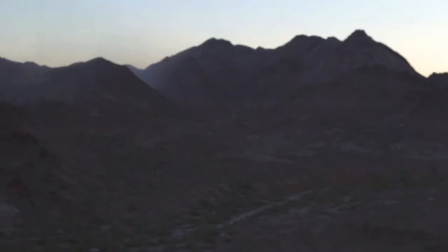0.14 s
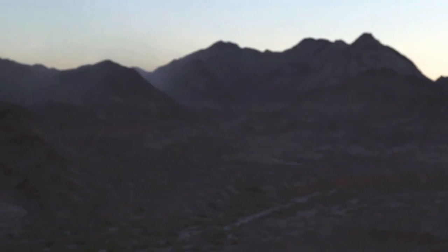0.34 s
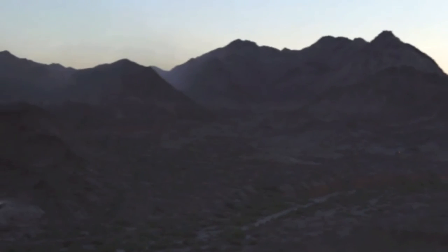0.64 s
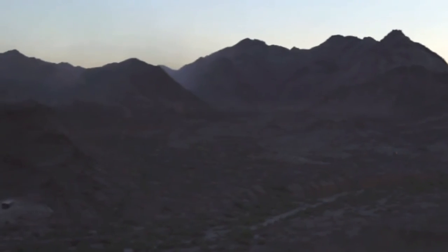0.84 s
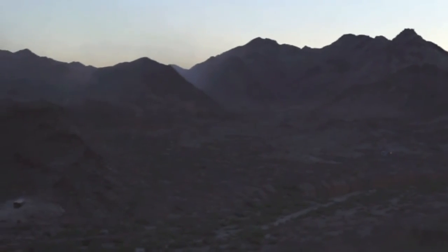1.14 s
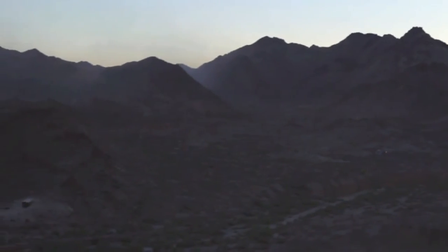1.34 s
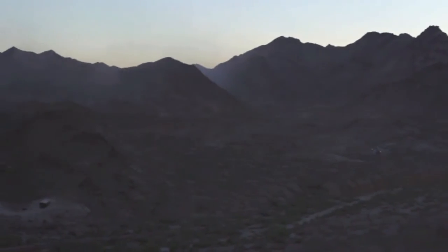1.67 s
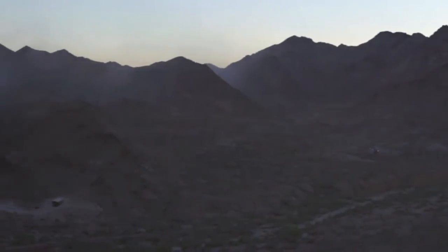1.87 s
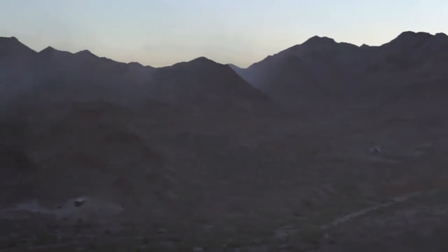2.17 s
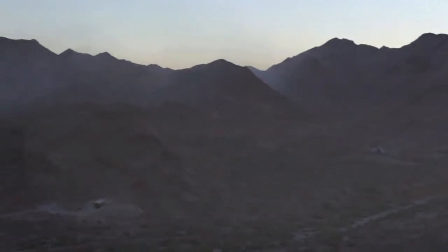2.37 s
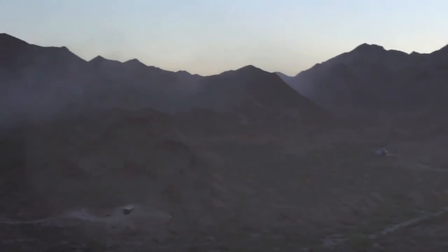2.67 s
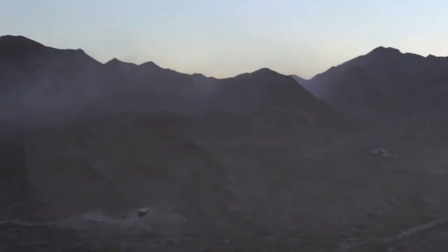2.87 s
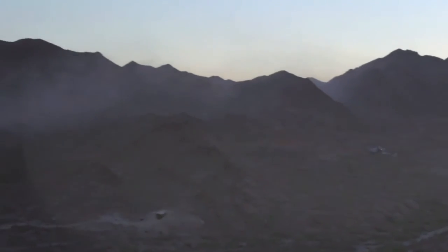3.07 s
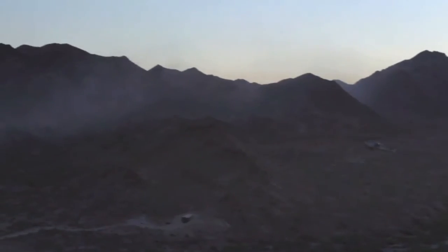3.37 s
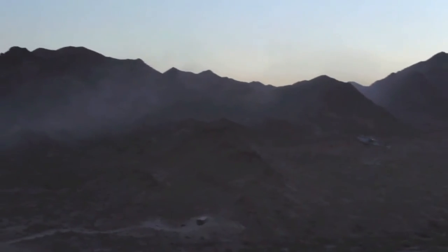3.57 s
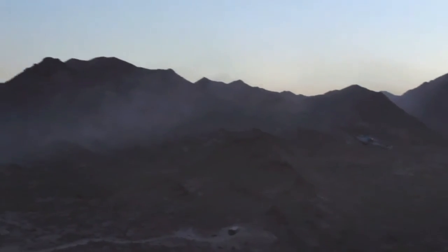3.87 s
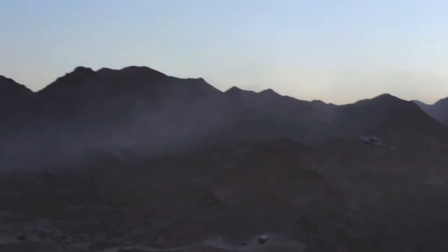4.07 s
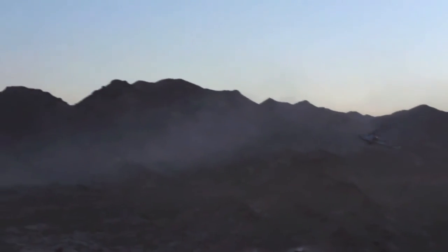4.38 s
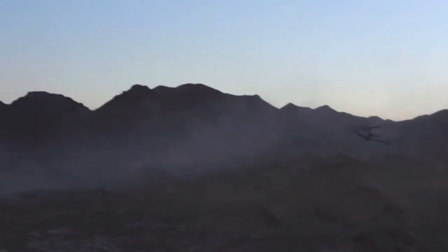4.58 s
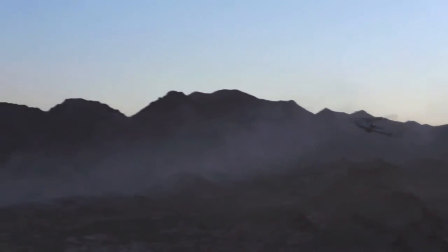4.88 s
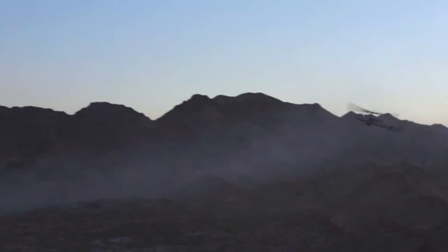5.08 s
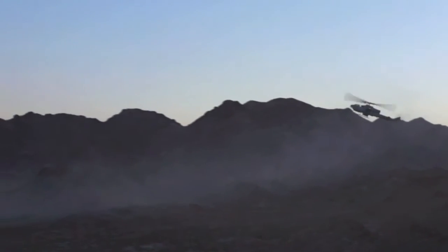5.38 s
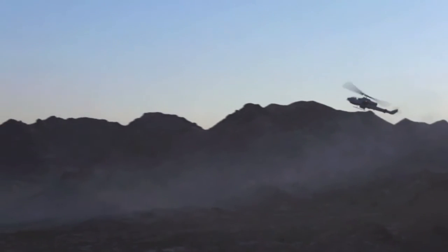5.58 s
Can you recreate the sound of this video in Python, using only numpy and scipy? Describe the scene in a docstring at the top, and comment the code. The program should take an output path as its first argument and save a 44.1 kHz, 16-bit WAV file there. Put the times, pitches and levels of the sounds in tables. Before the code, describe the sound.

A distant helicopter chops through a mountain valley for nearly six seconds, at about twelve blade slaps a second. Each slap is a short, hollow thud with a crack and a quick echo from the slopes. Low rumble, exhaust noise, soft turbine hiss and a faint wavering whine continue underneath, the whine clearest near 1.8 seconds.

Close to the microphone, cloth rustles faintly during the first second, followed by tiny camera ticks until about 2.3 seconds and a few more after 3. Irregular dull pops crowd between the slaps from 0.5 to 1.2 seconds and occasionally return later.

The slaps grow loud and sharp from 2.4 to 2.8 seconds, ease, then surge again from 3.7 to 4.7, the strongest slightly distorted. They stay crisp while weakening after that, and are softer and duller by 5.5 seconds, still beating at the end.

```python
"""Helicopter blade slap in a valley

A distant two-blade helicopter banks across a mountain valley. Each blade passage radiates a pressure
pulse (suction dip, crack, short ring, low thump) that the slopes reflect; dull pops fall between.
Broadband rumble, exhaust and turbine noise and a gearbox whine lie underneath. Beside the microphone,
cloth rustles and the body of a small camera ticks. The loudest slaps clip."""
import sys
import numpy as np
from scipy import signal
from scipy.fft import rfft, irfft, next_fast_len
from scipy.io import wavfile
from scipy.ndimage import uniform_filter1d, map_coordinates

SR = 44100
rng = np.random.default_rng(int(sys.argv[2]) if len(sys.argv) > 2 else 0)


def bounce(signal):
    """Save signal as a 16-bit WAV file at the path given by the first command-line argument."""
    frames = np.transpose(np.atleast_2d(signal))
    limited = np.clip(frames, -1, 1)
    pcm = np.round(limited * 32767).astype(np.int16)
    wavfile.write(sys.argv[1], SR, pcm)


N = 252252

# blade passages: t/s, ring level/dB, crack level/dB, echo level/dB re the slap
BLADE_PASSAGES = [(0.059, -35, -44, -4), (0.1473, -11.5, -48, -13), (0.232, -17, -37, 1),
                  (0.3173, -16.5, -38, -3.5), (0.4026, -15, -50, -8), (0.4883, -17, -47, -18),
                  (0.5728, -16, -53, 0.5), (0.6578, -17.5, -44, -1), (0.747, -20, -52, 3),
                  (0.829, -29, -60, -2), (0.9148, -23, -51, 4.4), (0.9996, -17, -47, -11),
                  (1.0862, -28, -55, 8.5), (1.1721, -17, -64, -2.5), (1.2572, -15.5, -58, -4),
                  (1.3417, -17.5, -56, -10), (1.4263, -17, -57, -0.2), (1.511, -15, -46, -1.5),
                  (1.5983, -21.5, -49, -6), (1.6809, -19.5, -48, -1), (1.767, -23.6, -44, 6.5),
                  (1.8509, -13.5, -53, -15), (1.9353, -12, -34, -7.9), (2.0231, -17, -44, 0.5),
                  (2.1051, -16, -50, 7), (2.1894, -16, -31.5, -1.5), (2.274, -14.1, -40, -2.5),
                  (2.3605, -13, -43, -6.5), (2.4448, -6, -30, -8.5), (2.5301, -8.5, -21, -6),
                  (2.6151, -8.5, -21, -10), (2.6997, -11, -41.5, -14), (2.776, -9, -32.5, -10),
                  (2.8602, -18, -34.5, -0.5), (2.9455, -17.5, -44, -10.5), (3.0311, -15.5, -34.5, -15.5),
                  (3.1164, -17, -36.5, -17), (3.1988, -22.5, -33, -5), (3.2904, -14, -49.5, -6.5),
                  (3.3749, -19, -60.5, -11), (3.4581, -16.5, -50, -8.5), (3.5455, -15.5, -33, -9),
                  (3.6284, -20, -32.5, 3.5), (3.7075, -8.5, -26, -3), (3.794, -7.5, -25.5, -11.5),
                  (3.881, -9.5, -29, -6), (3.9666, -8, -26.5, -6.5), (4.0531, -6.5, -26.5, -10),
                  (4.141, -6.5, -23, -8.5), (4.228, -7.5, -22, -9), (4.315, -6, -19, -22),
                  (4.403, -6.5, -23, -21), (4.4915, -8.4, -21.5, -11.5), (4.5803, -9.6, -22, -19),
                  (4.669, -10.5, -19.5, -16.5), (4.7582, -15, -22, -22), (4.8472, -13.5, -22.5, -13),
                  (4.9366, -13.5, -21.5, -13.5), (5.0262, -15, -28.5, -22), (5.1169, -15.5, -29.5, -11),
                  (5.2067, -22, -30, -8), (5.2983, -19.5, -33.5, -5.5), (5.3907, -24, -32.5, -2),
                  (5.4836, -23.5, -44, -0.5), (5.5719, -20, -49, -2), (5.6668, -17, -36, -18)]
# the slap as the helicopter turns: t/s, ring f/Hz, thump level/dB
SLAP_DIRECTIVITY = [(0, 218, -30), (.5, 203, -29.5), (1.2, 165, -23), (1.7, 168, -17.5), (2.3, 190, -23),
                    (2.5, 222.5, -26), (3.15, 245, -32), (3.4, 178, -20.5), (3.7, 200, -19),
                    (3.95, 202.5, -29), (4.4, 189.4, -43), (5.1, 165.6, -41.5), (5.72, 145.5, -22.5)]
# rock faces that return the echo in turn: start t/s, delay/ms, drift/(ms/s)
ROCK_FACES = [(0, 16.4, 0), (.7, 13, -1.8), (2.23, 11, .9), (2.74, 8.4, 0), (3.25, 12.3, 0),
              (3.67, 16.8, 3)]
# decay of the sound scattered by the slopes: f/Hz, T60/s
SLOPE_DECAY = [(60, 0.38), (250, 0.1), (1000, 0.15), (4000, 0.069)]
# dull pops between slaps: t/s, pulse level/dB, clack level/dB
SINGLE_POPS = [(.602, -23, -39), (.617, -14, -39), (.626, -21, -47), (.635, -12.5, -52), (.643, -19, -58),
               (.674, -25, -51), (.72, -15, -53), (.754, -26, -52), (.857, -33, -41.5), (.877, -22, -39),
               (.947, -20, -45), (.969, -19, -50), (1.01, -23, -44), (1.038, -21.5, -38.5),
               (1.112, -21, -44), (1.129, -16, -33), (1.646, -19, -42), (2.063, -24.5, -57),
               (2.139, -17, -47.5), (3.311, -19, -40.5), (3.721, -26.5, -34), (3.809, -14.5, -33)]
# runs of weaker pops: start t/s, duration/s, level/dB
POP_FLURRIES = [(0.541, .23, -23), (0.902, .25, -25), (1.604, .06, -28)]
# broadband noise: t/s, rumble level/dB, exhaust level/dB, turbine level/dB
ROAR_LEVELS = [(0, -35.5, -34.5, -53), (.55, -27.5, -37, -51.5), (1.07, -26.5, -41, -57),
               (1.3, -32.5, -46, -54.5), (2, -28.5, -40.5, -48), (2.3, -32.5, -37.5, -50),
               (2.6, -39.5, -42, -55), (3.1, -33, -41.5, -54.5), (3.74, -34, -35.5, -49.5),
               (4.4, -37.5, -40, -49.5), (4.7, -42, -44, -54), (5.21, -40.5, -43, -53),
               (5.72, -33, -37.5, -47.5)]
# noise spectra: f/Hz, relative density level/dB
RUMBLE_SPECTRUM = [(25, -35.5), (80, -4.5), (130, -6.5), (200, -1.5), (260, -5.5), (440, -17.5), (900, -30),
                   (1500, -55.5), (2600, -120)]
EXHAUST_SPECTRUM = [(180, -32), (300, -6), (359, -2), (453, -8.5), (693, -8.5), (909, -12), (1400, -27.5),
                    (1820, -64), (3080, -120)]
TURBINE_SPECTRUM = [(590, -29), (1000, -8.5), (1310, -7.5), (1510, -7.5), (1660, -8), (1890, -9.5),
                    (2570, -21), (3050, -22), (3960, -32.5), (4900, -51.5), (6710, -120)]
CLOTH_SPECTRUM = [(1500, -29.5), (3000, 0), (4500, -3.5), (6500, -9.5), (7500, -6.5), (8600, -3.5),
                  (11000, -10.5), (14000, -17.5), (16000, -28)]
# gearbox whine: t/s, level/dB
WHINE_LEVELS = [(0, -57.5), (.54, -59), (.78, -70), (.9, -55.5), (1.15, -58), (1.36, -63.5), (1.5, -48),
                (1.72, -55.5), (1.82, -42), (1.93, -54), (2.29, -50), (2.4, -54.5), (2.58, -48),
                (2.74, -53.5), (2.82, -69), (3, -57), (3.5, -60.5), (4.1, -58), (5, -70), (5.72, -58)]
# cloth rubbing: start t/s, rise/s, hold/s, fall/s, level/dB
CLOTH_STROKES = [(0.08, 0.021, 0.22, .03, -60.5), (0.393, 0.097, 0.13, 0.17, -63),
                 (3.88, .1, 0.084, .03, -71)]
# snapping cloth folds: t/s, excitation level/dB
CLOTH_SNAPS = [(0.082, -44.5), (0.11, -45.5), (0.1374, -45), (0.1828, -43.5), (0.198, -41), (0.2418, -44.5),
               (0.2653, -46), (0.309, -42), (0.3295, -51), (0.3795, -52), (0.6135, -53), (0.929, -52)]
# resonances of the camera body: f/Hz, bandwidth/Hz, gain/dB
BODY_MODES = [(4020, 300, 1), (7830, 150, -13), (8300, 300, -10), (9390, 300, -14), (10400, 250, -14),
              (12300, 170, -12)]
# ticks of the camera body: t/s, excitation level/dB
BODY_TICKS = [(0.7525, -55), (0.8046, -54.5), (0.9326, -52.5), (1.0177, -58), (1.0705, -61), (1.103, -61.5),
              (1.1373, -58.5), (1.2264, -58), (1.3133, -60.5), (1.445, -55), (1.4776, -55.5),
              (1.5684, -53.5), (1.6048, -54), (1.6417, -57.5), (1.7335, -58), (1.7849, -56), (1.9, -55.5),
              (2.0287, -59), (2.2734, -57.5), (3.205, -60.5), (3.255, -59.5), (3.545, -58), (3.675, -59)]
# loose part in the camera: t/s, level/dB
RATTLE_LEVELS = [(0, -81), (.8, -77.5), (1.5, -78.5), (2.4, -84.5), (2.6, -97.5), (3.4, -84), (3.7, -68),
                 (3.8, -98), (5.72, -100)]


def rotor():
    """Impulsive radiation: each blade passage emits a slap, a crack and a thump; the slap echoes."""
    track = np.zeros(N)
    lead_s, thump_delay_s, slope_delay_s = .01, .0087, .00806
    t = np.arange(SR // 20) / SR - lead_s
    smoothing = bell(t[:2 * round(lead_s * SR) + 1], .00019)  # air and ground round off the edges
    thump = np.cos(2 * np.pi * 80 * (t - lead_s)) * bell(t - lead_s, .0049)
    times, ring_hz, thump_levels = np.transpose(SLAP_DIRECTIVITY)
    for s, ring_db, crack_db, echo_db in BLADE_PASSAGES:
        start = s - lead_s
        thump_db = np.interp(s, times, thump_levels) + .5 * rng.standard_normal()
        pulse = blade_pulse(t, np.interp(s, times, ring_hz))
        slap = amp(ring_db) * np.convolve(pulse, smoothing / smoothing.sum(), "same")
        add(track, start, slap + crack(t, crack_db, len(smoothing)))
        add(track, start - lead_s + thump_delay_s, amp(thump_db) * thump)
        echo_start = start + echo_delay(s)
        add(track, echo_start, amp(echo_db) * slap)
        add_facets(track, echo_start, t, ring_db + echo_db - 10.5 + .19 * (crack_db + 30.5))
        add(track, start + slope_delay_s, amp(-16) * slope_scatter(slap))
    return track


def blade_pulse(t, ring_hz):
    """A rarefaction precedes a damped oscillation, whose brief third harmonic sharpens the first crests."""
    phase = 2 * np.pi * ring_hz * t
    third = .12 * np.sin(3 * phase) * decay(t, .012)
    ring = (np.sin(phase) - third) * decay(t, .031) * (t > 0)
    suction = .72 * bell(t + .0007, .00033)
    return ring - suction


def crack(t, level_db, kernel_samples):
    """Nonlinear steepening: a stronger front is narrower. The ground scatters it; turbulence trails it."""
    width_s = .00012 * amp(-.4 * (level_db + 20))
    front = -amp(level_db + 10.5) * bell(t + .001, width_s)
    ground = amp(-31.5) * rng.standard_normal(SR // 30) * decay(np.arange(SR // 30) / SR, .053)
    scattered = np.convolve(np.gradient(front) * width_s * SR, ground)[:len(t)]
    eddies = np.diff(rng.standard_normal(len(t) + 1)) * decay(np.abs(t + .0006), .012) * (t > -.002)
    turbulence = np.convolve(eddies, bell(t[:kernel_samples], .56 * width_s), "same")
    return front + scattered + amp(level_db - 15.5) * turbulence / np.abs(turbulence).max()


def echo_delay(s):
    """Specular reflection: the delay in seconds by way of the rock face that answers at time s."""
    delays_ms = [delay + drift * (s - start) for start, delay, drift in ROCK_FACES if start <= s]
    return delays_ms[-1] / 1000


def add_facets(track, echo_start, t, level_db):
    """Rough-surface reflection: five rock facets spread sharp wavelets around the main echo."""
    wavelet = (1 - (t / .0004) ** 2) * bell(t, .0004)
    for lag, size in rng.random((5, 2)):
        add(track, echo_start + .02 * (lag - .25), amp(level_db) * (2 * size - 1) * wavelet)


def slope_scatter(sound):
    """Diffuse reflection: the hillsides give each slap a new random tail, longest in the bass."""
    hz, t, spectrum = signal.stft(rng.standard_normal(SR // 5), SR, nperseg=256)
    tail = signal.istft(spectrum * decay(t, log_interp(SLOPE_DECAY, hz)[:, None]), SR, nperseg=256)[1]
    return signal.fftconvolve(sound, tail / np.linalg.norm(tail))


def pops():
    """Rarefaction pulses: each pop is a suction spike with a clack of noise resonating near 1.4 kHz."""
    spikes, clacks = np.zeros(N), np.zeros(N)
    width_s, clack_rise_s = .00063, .0017
    t = np.arange(SR // 50) / SR
    u = (t - .003) / width_s
    suction = -(1 - u ** 2) * bell(u, .96)
    clack_envelope = (1 - np.exp(-t / clack_rise_s)) * decay(t, .038)
    for s, spike_db, clack_db in list(SINGLE_POPS) + flurries():
        add(spikes, s, amp(spike_db) * suction)
        add(clacks, s, amp(clack_db + 22.5) * clack_envelope * rng.standard_normal(len(t)))
    knock = resonances([(1386, 940, 0)])
    return spikes + filtered(clacks, lambda hz: knock(hz) ** 4)


def flurries(mean_gap_s=.014):
    """Jittered pulse trains: further pop rows, uneven in spacing and level."""
    rows = []
    for start, duration, db in POP_FLURRIES:
        for k, (jitter, size) in enumerate(rng.random((40, 2))):
            offset = (k + jitter) * mean_gap_s
            if offset < duration:
                rows.append((start + offset, db + 8 * (size - .5), db - 28))
    return rows


def roar():
    """Reverberant decay: valley rumble and exhaust drain after each slap, under a smoother turbine hiss."""
    rumble_db, exhaust_db, turbine_db = curves(ROAR_LEVELS)
    t, slap_times = np.arange(N) / SR, np.array(BLADE_PASSAGES)[:, 0]
    since_slap = t - slap_times[np.maximum(np.searchsorted(slap_times, t) - 1, 0)]
    drain = decay(uniform_filter1d(np.abs(since_slap), size=600), t60=1.18)
    swell = wobble(30)  # common to all three noises
    lumps = amp(2.5 * np.tanh(swell))
    rumble = amp(rumble_db) * unit(lumps * patchy_noise(RUMBLE_SPECTRUM, spread_db=.5))
    exhaust_gain = amp(exhaust_db + .28 * np.tanh(swell) + 1.9 * wobble(90))
    exhaust = exhaust_gain * patchy_noise(EXHAUST_SPECTRUM, spread_db=2.5)
    turbine_gain = amp(turbine_db + .39 * swell + .27 * wobble(25) + 1.6 * wobble(110))
    turbine = turbine_gain * patchy_noise(TURBINE_SPECTRUM, spread_db=2.5)
    return drain * (rumble + exhaust) + turbine


def gearbox():
    """Gear meshing: a wavering tone in narrow-band noise fades in and out as it crosses moving air."""
    mesh_hz = 1500 + 8 * wobble(30)
    tone = np.sin(2 * np.pi * np.cumsum(mesh_hz) / SR)
    band = resonances([(1554, 300, 0)])
    halo = unit(filtered(rng.standard_normal(N), lambda hz: band(hz) ** 2))
    return amp(curves(WHINE_LEVELS)[0] + 1.2 * wobble(22)) * (tone + .7 * halo)


def cloth():
    """Friction noise: cloth rubs in grainy strokes, and its folds snap in short bursts."""
    t = np.arange(N) / SR
    envelope = amp(-75 - 2.5 * t)  # the cloth slowly settles between strokes
    for s, rise, hold, fall, db in CLOTH_STROKES:
        ramp = np.minimum((t - s) / rise, 1 + (s + rise + hold - t) / fall)
        envelope += amp(db) * np.clip(ramp, 0, 1) ** 2
    grain = amp(2.5 * wobble(300) + 1.3 * wobble(70))
    rubbing = envelope * unit(grain * patchy_noise(CLOTH_SPECTRUM, spread_db=-3.5))
    snaps = filtered(bursts(CLOTH_SNAPS, t60=.0073), lambda hz: amp(log_interp(CLOTH_SPECTRUM, hz) + 7))
    return rubbing + snaps


def camera_body(taps_per_s=1200):
    """Modal response: ticks and the random impacts of a loose part excite the shell's resonances."""
    shell = resonances(BODY_MODES)
    ticks = amp(11) * filtered(bursts(BODY_TICKS, t60=.033), shell)
    taps = (rng.random(N) < taps_per_s / SR) * amp(3 * rng.standard_normal(N) + 3 * wobble(30))
    rattle = amp(curves(RATTLE_LEVELS)[0]) * unit(filtered(taps, shell))
    return ticks + rattle


def amp(db):
    """Amplitude ratio of a level in dB."""
    return 10 ** (np.asarray(db) / 20)


def decay(t, t60):
    """Exponential damping by 60 dB in t60 seconds."""
    return amp(-60 * t / t60)


def bell(t, width):
    """Gaussian pulse centred on t = 0."""
    return np.exp(-.5 * (t / width) ** 2)


def unit(x):
    """Normalisation to rms 1."""
    return x / np.sqrt(np.mean(x ** 2) + 1e-20)


def log_interp(points, hz):
    """Interpolation of (f/Hz, value) points on a logarithmic frequency axis."""
    frequencies, values = np.transpose(points)
    return np.interp(np.log(hz + 1), np.log(frequencies + 1), values)


def curves(rows):
    """Linear interpolation, sample by sample, of each column after t/s."""
    times, *columns = np.transpose(rows)
    return [np.interp(np.arange(N) / SR, times, column) for column in columns]


def wobble(rate):
    """Smooth random modulation with rate knots a second."""
    return map_coordinates(rng.standard_normal(int(N * rate / SR) + 4), [np.arange(N) * rate / SR])


def filtered(x, response):
    """Linear filtering: the spectrum of x times a frequency response."""
    size = next_fast_len(N + 8192)
    return irfft(rfft(x, size) * response(np.fft.rfftfreq(size, 1 / SR)), size)[:N]


def resonances(modes):
    """Causal response of damped modes (f/Hz, bandwidth/Hz, gain/dB), summed with alternating sign."""
    return lambda hz: sum((-1) ** k * amp(db) * 1j * hz * width / (f0 * f0 - hz * hz + 1j * hz * width)
                          for k, (f0, width, db) in enumerate(modes))


def patchy_noise(spectrum, spread_db):
    """Shaped noise of rms 1, modulated in random patches of time and frequency."""
    cells = signal.stft(rng.standard_normal(N), nperseg=512)[2]
    patches = uniform_filter1d(rng.standard_normal(cells.shape), size=5, axis=0)
    patches = uniform_filter1d(patches, size=8, axis=1)
    noise = signal.istft(cells * amp(spread_db * unit(patches)), nperseg=512)[1][:N]
    return unit(filtered(noise, lambda hz: amp(log_interp(spectrum, hz))))


def bursts(events, t60):
    """Transient excitation: a damped noise burst at each (t/s, level/dB) event."""
    track, t = np.zeros(N), np.arange(SR // 50) / SR
    for s, db in events:
        add(track, s, amp(db) * decay(t, t60) * rng.standard_normal(len(t)))
    return track


def add(track, s, sound):
    """Superposition of a sound on the track from time s on."""
    part = track[max(round(s * SR), 0):][:len(sound)]
    part += sound[:len(part)]


def scene():
    """Superposition of all sources at one microphone."""
    return (rotor() + pops() + roar() + gearbox() + cloth() + camera_body())[None]


def record(dry):
    """Band limiting and saturation: the small microphone loses deep bass and the input stage clips."""
    bass_hz, ceiling, top_hz = 40, .263, 15600
    thin = filtered(dry[0], lambda hz: (1j * hz / (1j * hz + bass_hz)) ** 2)
    clipped = thin / (1 + np.abs(thin / ceiling) ** 20) ** (1 / 20)
    return filtered(clipped, lambda hz: 1j * hz / (1j * hz + 15) * (hz < top_hz))[None]


dry = scene()
out = record(dry)
bounce(out)
```